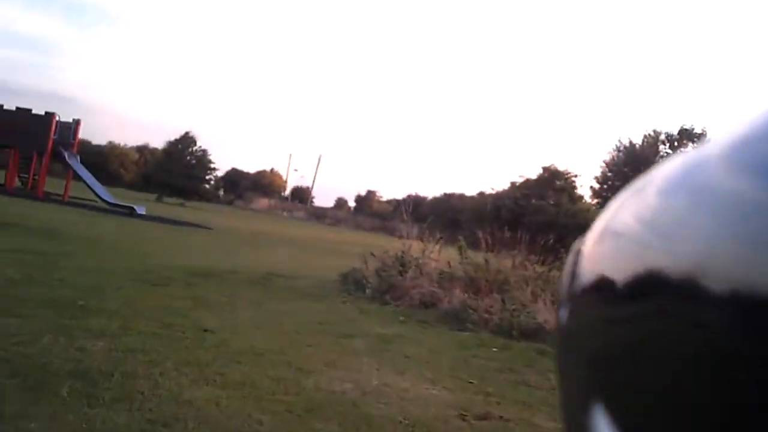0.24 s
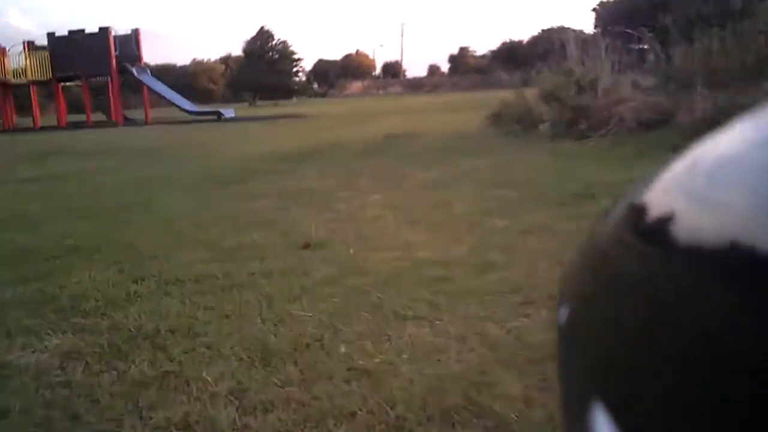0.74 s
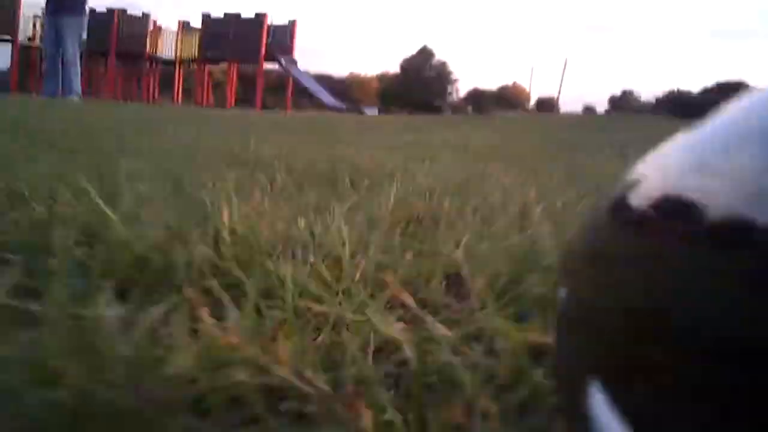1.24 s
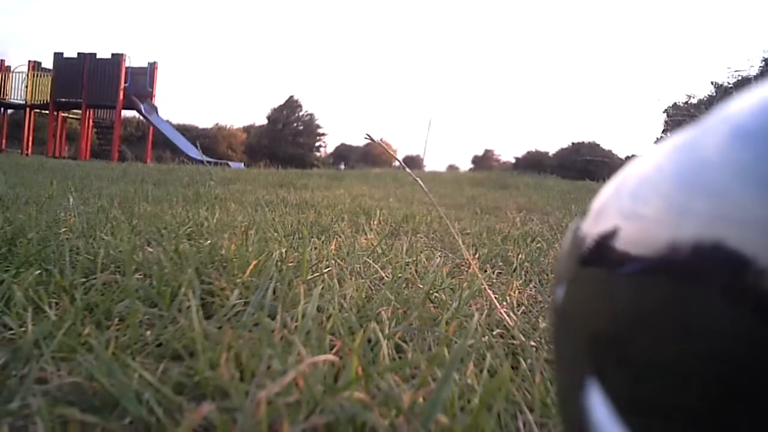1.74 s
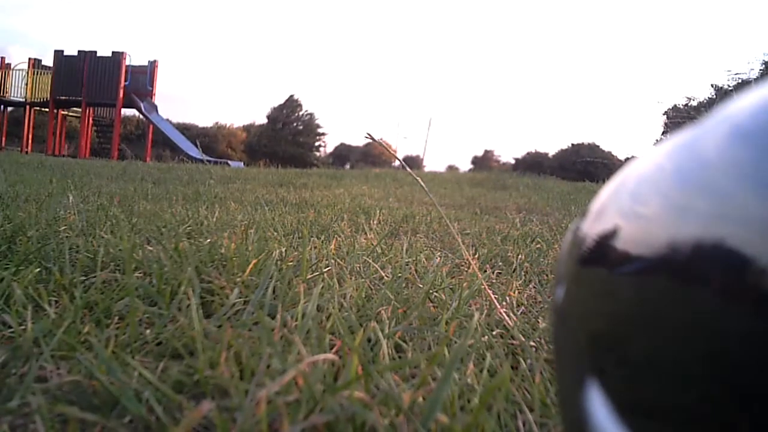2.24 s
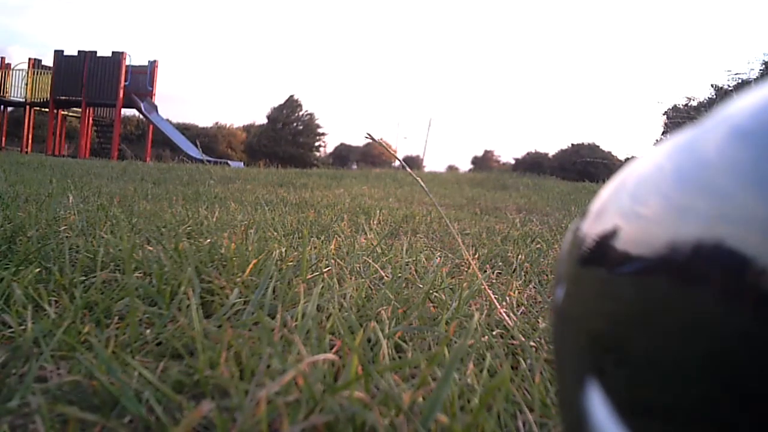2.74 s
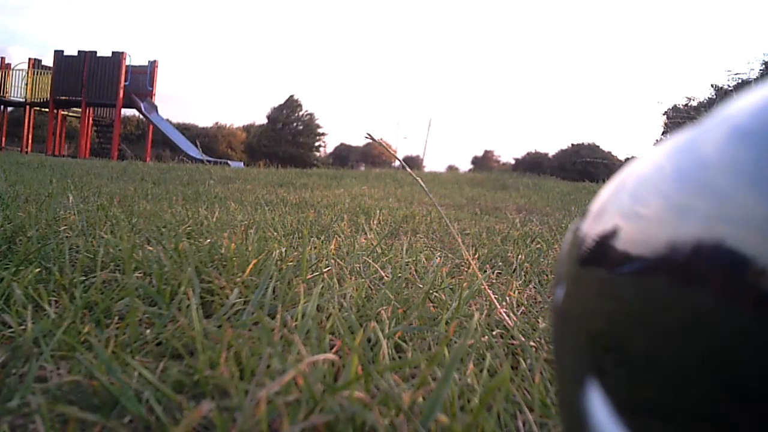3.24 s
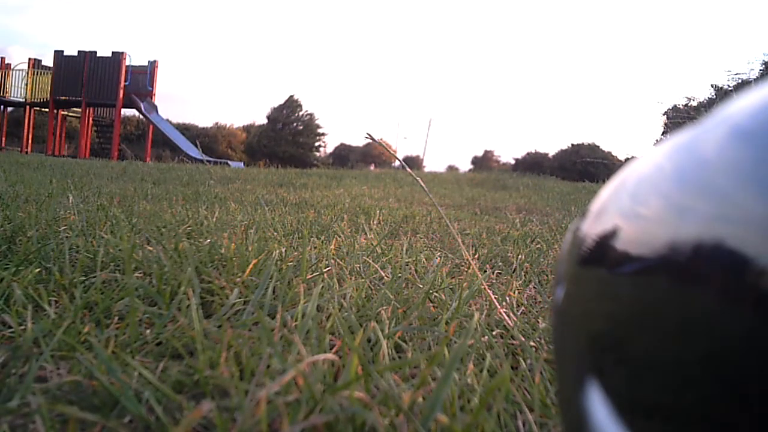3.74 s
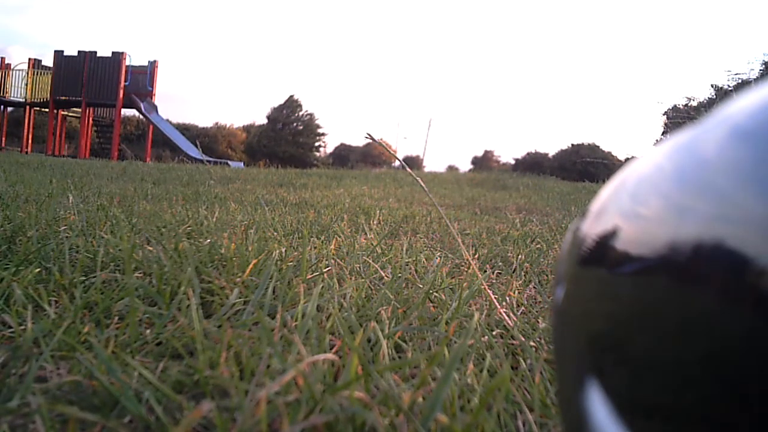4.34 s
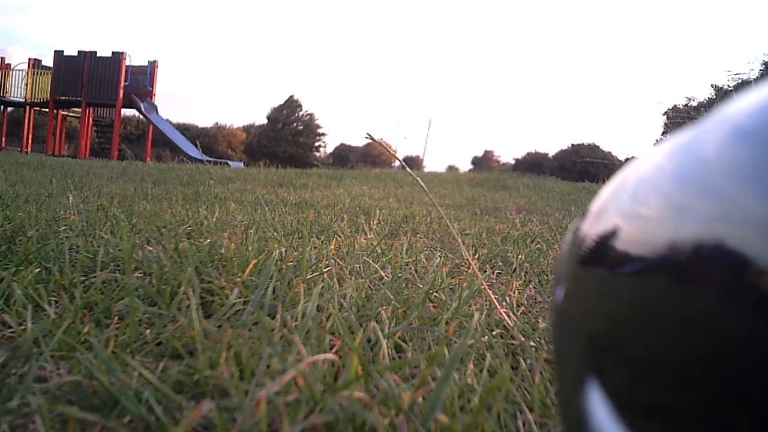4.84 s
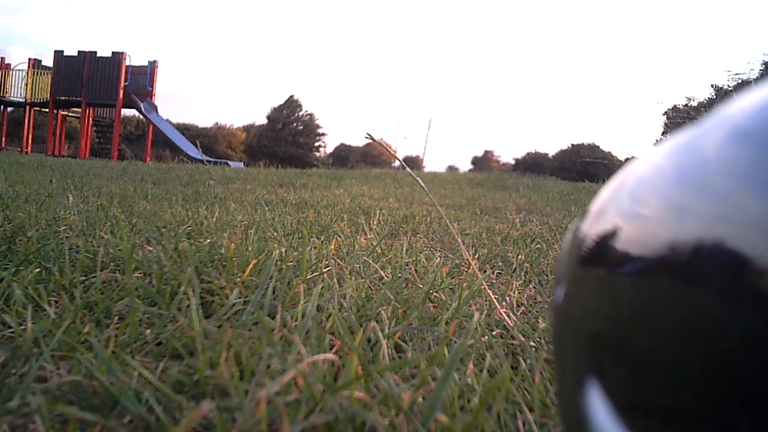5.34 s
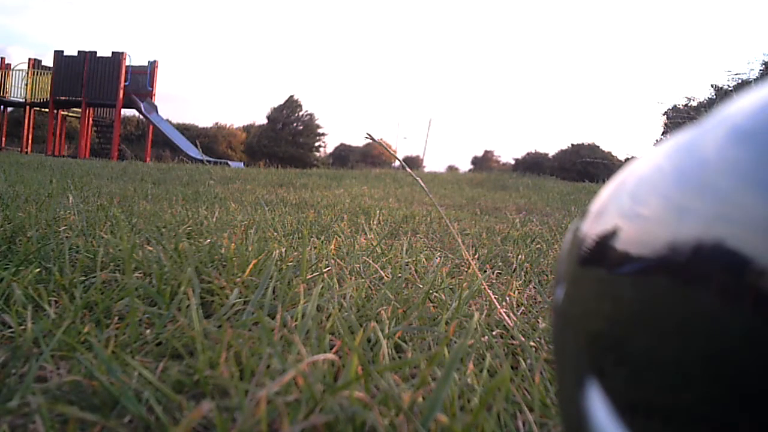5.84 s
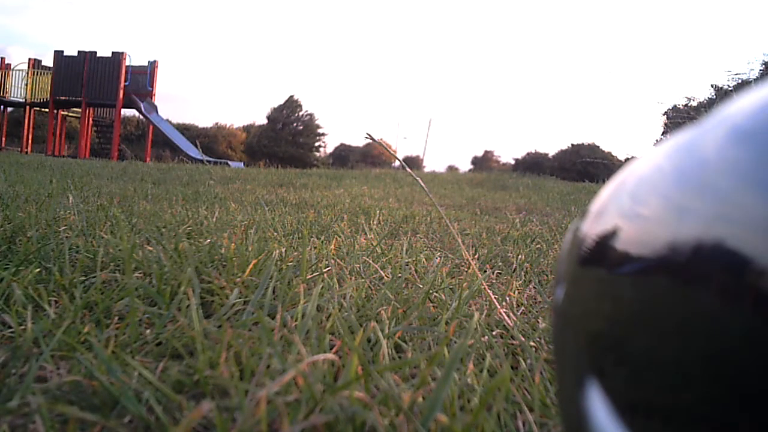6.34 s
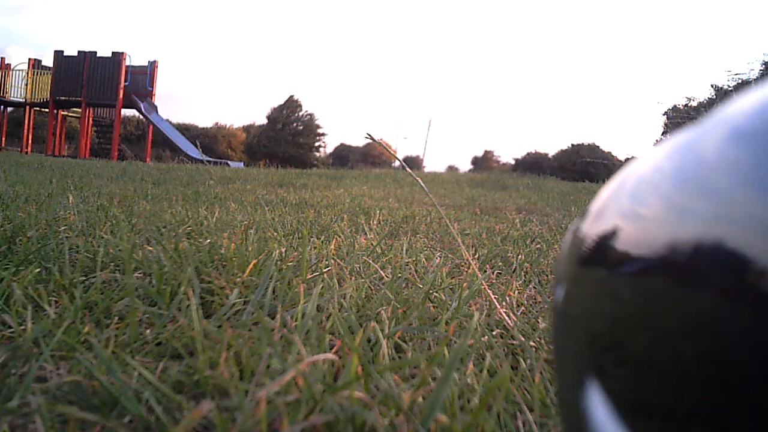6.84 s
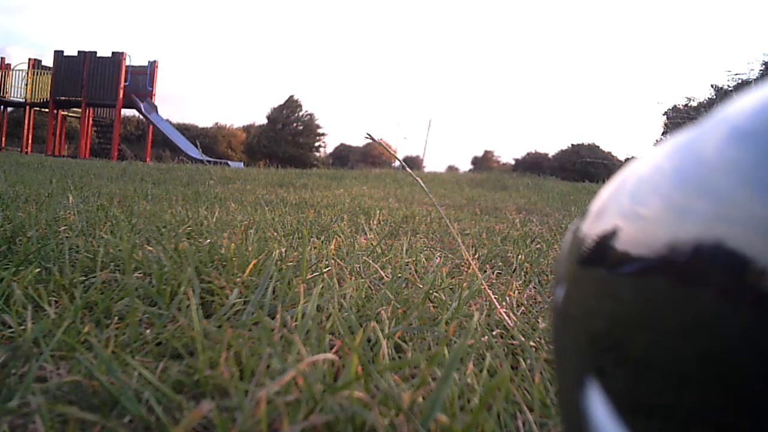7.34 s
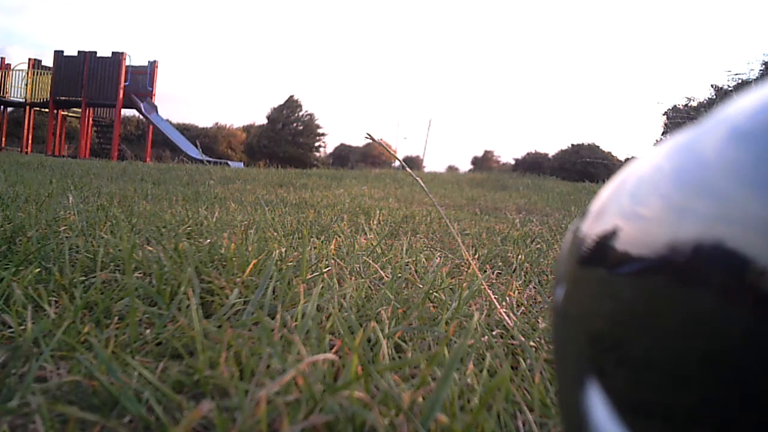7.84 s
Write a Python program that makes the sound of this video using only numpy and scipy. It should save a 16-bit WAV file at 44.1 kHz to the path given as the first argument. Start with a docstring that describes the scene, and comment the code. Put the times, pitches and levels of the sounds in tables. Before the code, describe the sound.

A small electric model plane whines down, knocks onto grass and slides to rest, leaving faint ticks and servo twitches.

```python
"""A small electric model plane glides in, heard from its own body. Magnetic cogging makes the motor
whine; it is throttled back, and its loose shaft rattles once a turn as it runs down. At 1 s the belly
knocks onto grass, bounces and slides to rest, while the rotor chatters to a stop by 2.5 s. Small ticks
ring the airframe ever more rarely, and servo gears twitch now and then over the drone of a far engine."""
import sys
import numpy as np
from scipy import signal
from scipy.fft import rfft, irfft, next_fast_len
from scipy.io import wavfile
from scipy.ndimage import uniform_filter1d

SR = 44100
rng = np.random.default_rng(int(sys.argv[2]) if len(sys.argv) > 2 else 0)


def output_pcm(signal):
    """Save a mono or channel-first signal as 16-bit PCM at the path in sys.argv[1].

    Samples are clipped to [-1, 1] before scaling.
    """
    pcm = np.clip(np.atleast_2d(signal).T, -1, 1) * 32767
    wavfile.write(sys.argv[1], SR, np.round(pcm).astype(np.int16))


N = 357651
TIME = np.arange(N) / SR
HZ = np.fft.rfftfreq(8192, 1 / SR)  # frequency grid of the filter gains


def motor():
    """Rotating machinery: one shaft paces tones and noises alike, until it stands still."""
    speed = shaft_speed()
    turns = np.cumsum(speed) / SR
    tones = propeller(turns, speed) + whine(turns, speed) + controller(turns)
    noises = churn(turns, speed) + rattle_brightness(rattle(turns, speed)) + chatter(turns, speed)
    return (tones + noises) * fading(2.4, db_per_s=300)


# rotation rate as the motor is throttled back: t/s, f/Hz
SHAFT_RATE = [(0, 209.7), (.2, 202.9), (.45, 190), (.6, 168.5), (.7, 153.5), (.8, 135.3), (.9, 119.7),
              (1, 107.2), (1.1, 92)]
def shaft_speed(stop_s=2.477, friction_hz_per_s=36.17, drag=15.6, drag_power=3.12):
    """Run-down: the shaft slows, then coasts, braked by friction and, while fast, by air drag."""
    time_left = np.maximum(stop_s - TIME, 0)
    coasting = friction_hz_per_s * time_left + drag * time_left ** drag_power
    speed = np.where(TIME < SHAFT_RATE[-1][0], curve(SHAFT_RATE), coasting)
    return np.maximum(uniform_filter1d(speed, size=1500), .5)


# harmonics of the propeller: multiple of the shaft rate, relative level/dB
PROPELLER_HARMONICS = [(1, -1), (2, -9.5), (3, -7.5), (4, -15.5), (5, -12.5), (6, -12), (7, -13.5),
                       (8, -8.5), (9, -13.5), (10, -12.5), (12, -15)]
def propeller(turns, speed, shake_db=-24, knee_hz=58, flutter=0.083, mellow_db=8):
    """Rotating unbalance shakes the frame; the upper harmonics flutter more and fade first."""
    share = speed / speed[0]
    sway = .005 * wander(25)
    tones = np.zeros(N)
    for order, db in PROPELLER_HARMONICS:
        phase = 2 * np.pi * (order * (turns + sway) + rng.random())
        level = gain_of(db - mellow_db * (1 - share) * np.log(order))
        tones += level * np.cos(phase) * (1 + flutter * order ** 0.87 * wander(35))
    shake = gain_of(shake_db) * share ** 0.83 / np.hypot(1, (knee_hz / speed) ** 2)
    return np.sqrt(2) * shake * tones


# magnets passing the stator teeth: multiple of the shaft rate, relative level/dB
COGGING_HARMONICS = [(12, -16), (18, -17), (24, -18.5), (26, -28), (28, -20.5), (36, 3), (38, -13),
                     (44, -26)]
# fuselage resonances: f/Hz, width/Hz, gain/dB
FUSELAGE_MODES = [(153, 13.6, -33.5), (267, 14, -38.5), (514, 55.4, -28.5), (765, 94, -25), (936, 24, -26),
                  (1085, 23, -20), (1280, 110, -21), (1503, 189, -27), (2024, 122, -20), (4020, 540, -31),
                  (5230, 940, -37), (6790, 380, -35)]
def whine(turns, speed, flutter=0.044, judder=0.22, rasp=0.17):
    """Forced vibration: cogging tones swell at each resonance and judder as the rotor loses momentum."""
    response = resonant(FUSELAGE_MODES, order=2)
    tones = np.zeros(N)
    for order, db in COGGING_HARMONICS:
        level = gain_of(db) * np.interp(order * speed, HZ, response)
        tones += level * np.cos(2 * np.pi * (order * turns + rng.random()))
    slowness = np.exp(-(speed / 36) ** 4)
    wobble = flutter * (1 + speed / 60) * wander(50)
    stumble = judder * (np.cos(2 * np.pi * turns) + 0.88 * wander(100)) + rasp * wander(354)
    return np.sqrt(2) * tones * (1 + wobble + slowness * stumble)


def controller(turns, switching_hz=8016, level_db=-33.5, throttle_off_s=0.52):
    """Amplitude modulation: the switching tone pulses with each turn until the throttle closes."""
    pulsing = 1 + 0.18 * np.cos(2 * np.pi * turns) + 0.17 * wander(250)
    tone = np.cos(2 * np.pi * switching_hz * TIME) * pulsing
    return gain_of(level_db) * fading(throttle_off_s, db_per_s=1000) * tone


# air and bearing noise, envelope: t/s, level/dB
CHURN_ENVELOPE = [(0, -26), (.35, -27.5), (.78, -30.5), (1, -25.5), (1.08, -34), (1.25, -28), (1.8, -30),
                  (2.08, -40.5), (2.25, -58)]
# its spectrum: f/Hz, relative level/dB
CHURN_SPECTRUM = [(150, -49), (250, -11), (364, -18.5), (404, -10), (513, -11.5), (609, -11), (699, -15),
                  (829, -13.5), (1650, -7.5), (2700, -15), (3620, -9), (5370, -19), (8100, -18),
                  (8820, -26), (15000, -43.5)]
def churn(turns, speed, throb=0.31, dull_hz=2400):
    """Broadband noise of air and bearings, modulated by the shaft and duller at low speed."""
    roughness = grit(9000, spread_db=0.99) * (1 + throb * np.cos(2 * np.pi * turns))
    bright = colour(roughness, smooth(CHURN_SPECTRUM))
    dull = signal.sosfilt(signal.butter(4, dull_hz, fs=SR, output="sos"), bright)
    share = (speed / speed.max()) ** 1.76
    return gain_of(curve(CHURN_ENVELOPE)) * (share * bright + (1 - share) * dull)


# bouts of rattling: t/s, duration/s, relative level/dB
RATTLE_BOUTS = [(.335, 0.69, -27.5), (1.062, 0.017, -30.5), (1.112, 0.028, -30.5), (1.153, .028, -35.5)]
# motor mount resonances: f/Hz, width/Hz, relative gain/dB
MOUNT_MODES = [(926, 1200, -13.5), (2010, 870, -0.5), (3010, 250, 1.5), (3550, 178, 4), (4000, 200, -4),
               (4240, 510, -4), (4800, 280, -7), (5420, 320, -3), (6240, 420, -6.5), (7350, 570, -3),
               (8220, 380, -0.5), (9570, 710, -12), (10800, 1100, -23), (11200, 1400, -26.5),
               (11800, 930, -17.5), (13550, 900, -13.5), (14800, 700, -18)]
def rattle(turns, speed, bounce_s=0.000702, bounce=0.31, scrape_s=0.00089, shiver_s=0.0031):
    """Periodic impact: once a turn the loose shaft strikes its mount, bounces and scrapes."""
    hit_samples = np.interp(np.arange(1, turns[-1]), turns, np.arange(N))
    sizes = 1 + 0.1 * rng.standard_normal(len(hit_samples))
    places = np.r_[hit_samples, hit_samples + bounce_s * SR]
    blows, taps = np.zeros(N), np.arange(-8, 9)
    for place, size in zip(places, np.r_[sizes, -bounce * sizes]):
        impulse = np.sinc(taps - place % 1) * np.hanning(len(taps))  # falls between samples
        add(blows, (int(place) + taps[0]) / SR, size * impulse)
    since_hit = turns % 1 / speed
    scrape = np.exp(-since_hit / scrape_s) * rng.standard_normal(N) / np.sqrt(scrape_s * SR / 2)
    # the foam body shivers after each blow, differently every time
    shiver = np.exp(-since_hit / shiver_s) * rng.standard_normal(N) / np.sqrt(shiver_s * SR / 2)
    blows += 0.089 * scrape + 0.39 * colour(shiver, 1 / (1 + (HZ / 3000) ** 4))
    # dispersion of bending waves: all-pass stages spread each blow in time
    for pole in [.6, -.6] * 4:
        blows = signal.lfilter([pole, 0, 1], [1, 0, pole], blows)
    ringing = colour(blows * np.sqrt(SR / speed), resonant(MOUNT_MODES))
    return bouts(RATTLE_BOUTS, attack_s=0.0042, release_s=.004) * ringing


# treble of the rattle: t/s, gain/dB
TREBLE_GAIN = [(.36, -8), (.42, -1), (.48, -1), (.53, 8), (.62, 2), (.76, -19), (.83, 4), (1, -3),
               (1.1, -15)]
def rattle_brightness(sound, edge_hz=12700):
    """A time-varying shelf filter lifts or dulls the rattle's topmost ring."""
    hz = np.fft.rfftfreq(N, 1 / SR)
    treble = irfft(rfft(sound) / (1 + (edge_hz / (hz + 1)) ** 20), N)
    return sound + (gain_of(curve(TREBLE_GAIN)) - 1) * treble


# the chatter flares into squeals: t/s, duration/s, relative level/dB
SQUEAL_BOUTS = [(1.737, 0.043, -33), (1.84, .025, -33), (1.905, 0.014, -26)]
# nose resonances: f/Hz, width/Hz, relative gain/dB
NOSE_MODES = [(854, 70, 7), (1190, 120, 10), (1772, 160, 6), (2033, 210, -0.5), (2330, 72, -9),
              (3490, 220, -10)]
def chatter(turns, speed, cogs=36, strongest_at_hz=21, width_octaves=0.79):
    """Impulse-train excitation: at low speed each magnet snaps past its tooth and rings the nose."""
    snaps = np.diff(np.floor(cogs * turns), prepend=0) * (1 + 0.47 * rng.standard_normal(N))
    snaps *= 1 + 0.91 * np.cos(4 * np.pi * turns)  # the two blades load the shaft in turn
    force = gain_of(-39) * np.exp(-(np.log2(speed / strongest_at_hz) / width_octaves) ** 2)
    force += bouts(SQUEAL_BOUTS, attack_s=0.0058, release_s=0.013)
    return force * colour(snaps * np.sqrt(SR / (cogs * speed)), resonant(NOSE_MODES))


# the belly meets the ground: t/s, relative level/dB, half period/s
BELLY_BUMPS = [(1.005, -2, 0.015), (1.232, -8, 0.0258)]
# knocks of the frame: t/s, relative level/dB, decay time/s
FRAME_KNOCKS = [(1.0112, 2, 0.0015), (1.0135, 2.5, 0.00074), (1.024, -12, .002), (1.028, -1.5, 0.0008),
                (1.063, -11.5, 0.002), (1.258, -21, 0.0025), (1.2945, -9, .0018), (1.297, -10.5, 0.00098)]
# airframe resonances: f/Hz, width/Hz, relative gain/dB
AIRFRAME_MODES = [(176, 73, -1.5), (783, 360, -7.5), (1240, 99, 1), (1510, 260, -6), (2006, 260, 0),
                  (2330, 140, 1.5), (2990, 270, -8.5), (3450, 190, -4), (4040, 360, -5.5),
                  (4650, 440, -13.5), (5440, 280, -13.5), (5910, 220, -10), (7070, 870, -16),
                  (7840, 380, -9), (8760, 690, -15), (10560, 1600, -19.5), (12170, 990, -26),
                  (14760, 1200, -31)]
def landing(wing_hz=103, wing_decay_s=0.03):
    """Impact: slow pushes set the wing in damped vibration, and short knocks ring frame and mount."""
    bumps, t = np.zeros(N), TIME[:SR // 4]
    wing = gain_of(-13) * np.sin(2 * np.pi * wing_hz * t) * np.exp(-t / wing_decay_s)
    for s, db, half_period in BELLY_BUMPS:
        push = np.sin(np.pi * t / half_period) * np.exp(-(t / (1.94 * half_period)) ** 2)
        add(bumps, s, gain_of(db) * (push + wing))
    response = resonant(AIRFRAME_MODES) + 0.7 * resonant(MOUNT_MODES)
    return bumps + gain_of(-5) * colour(strikes(FRAME_KNOCKS), response)


# thicker tufts brush past: t/s, duration/s, level/dB
GRASS_TUFTS = [(1.02, 0.018, -36), (1.235, 0.051, -44), (1.42, 0.026, -45), (1.555, 0.032, -41.5),
               (1.652, 0.0051, -46)]
# rubbed grass: f/Hz, relative level/dB
GRASS_SPECTRUM = [(1530, -28), (2600, -10.5), (4190, -6.5), (5250, -13), (5960, -13), (7800, -14),
                  (9680, -21), (15500, -31.5)]
def slide(start_s=1.2, rest_s=2.05, rub_db=-43.5, patchy_db=4.5):
    """Sliding friction: grass brushes the belly unevenly, louder in tufts, until the plane rests."""
    rub = gain_of(rub_db) * (TIME > start_s) * fading(start_s, db_per_s=15)
    rub *= fading(rest_s, db_per_s=100)
    tufts = bouts(GRASS_TUFTS, attack_s=0.0037, release_s=0.0054)
    force = (rub + tufts) * gain_of(patchy_db * wander(59.7))
    return force * colour(grit(1300, spread_db=1.7), smooth(GRASS_SPECTRUM))


# knocks and small ticks as plane and rotor come to rest: t/s, relative level/dB
AIRFRAME_TICKS = [(1.241, -14.5), (1.906, -22), (2.091, -33), (2.148, -30.5), (2.237, -34), (2.295, -29),
                  (2.315, -35), (2.337, -36), (2.374, -39), (2.435, -39), (2.757, -35), (2.935, -40),
                  (3.14, -37), (3.354, -41), (3.51, -40.5), (3.677, -38), (3.861, -42.5)]
# belly and wing resonances: f/Hz, width/Hz, relative gain/dB
BELLY_MODES = [(803, 143, 10), (1260, 110, -19), (1800, 290, -4), (2370, 300, -9.5), (3240, 310, -12)]
WING_MODES = [(1195, 390, 6), (2100, 620, 3), (2950, 290, -0.5), (3560, 270, 2), (4070, 280, -5),
              (7700, 7500, -15.5)]
def ticks(start_s=2.1, end_s=3.6, count=14, decay_s=.0055):
    """Impulse response: knocks and small ticks ring now the belly, now a wing, ever more rarely."""
    time_chance, level_chance = rng.random((count, 2)).T
    delay = (end_s - start_s) * ((np.arange(count) + time_chance) / count) ** 2
    random_ticks = zip(start_s + delay, -38 - 0.5 * delay + 2 * (2 * level_chance - 1))
    hits = [(s, db, decay_s) for s, db in [*AIRFRAME_TICKS, *random_ticks]]
    toward_belly = gain_of(4.5 * wander(3.1))
    belly = colour(strikes(hits) * toward_belly, resonant(BELLY_MODES))
    wing = colour(strikes(hits) / toward_belly, resonant(WING_MODES))
    return gain_of(-11) * (belly + wing)


# servo movements: t/s, run time/s, level at full speed/dB
SERVO_TWITCHES = [(1.991, 0.027, -29.5), (2.028, 0.03, -28.5), (2.653, 0.0014, -38.5), (4.811, 0.012, -34),
                  (4.829, 0.019, -21.5), (4.857, 0.0037, -37), (5.664, 0.018, -28), (5.695, .009, -33),
                  (7.176, 0.027, -27), (7.207, 0.021, -24.5), (7.4495, 0.0048, -31), (7.461, 0.007, -27.5),
                  (7.573, 0.0056, -33.5), (7.744, 0.0031, -35.5)]
# bands in which the gears sing: f/Hz, width/Hz, relative gain/dB
GEAR_BANDS = [(2030, 300, -4), (2390, 300, -5.5), (4190, 90, -4)]
def servos(climb_db_per_s=378, coast_s=0.0038):
    """Gear noise: a servo speeds up and coasts; tooth impacts ring the frame, and fast gears sing."""
    force, t = np.zeros(N), TIME[:SR // 10]
    for s, run_s, db in SERVO_TWITCHES:
        climb = gain_of(db - climb_db_per_s * np.maximum(run_s - t, 0))
        coast = np.exp(-np.maximum(t - run_s, 0) / coast_s)
        add(force, s, climb * coast)
    teeth = colour(force * grit(7000, spread_db=2.8), resonant(AIRFRAME_MODES))
    song_level = force * np.sqrt(force / force.max())
    song = colour(song_level * rng.standard_normal(N), resonant(GEAR_BANDS))
    return teeth + gain_of(-3) * song


# far engine, envelope: t/s, relative level/dB
ENGINE_ENVELOPE = [(1.2, -48), (2.2, -42), (3.5, -41.5), (5.2, -43.5), (5.8, -41), (6.9, -39), (7.5, -41.5),
                   (8.1, -41)]
# its harmonics: multiple of the fundamental, relative level/dB
ENGINE_HARMONICS = [(1, -3.5), (2, -18), (3, -28)]
def far_engine(start_hz=144.4, sag_hz_per_s=1.29, waver=0.16):
    """A harmonic series sinks slowly in pitch; its path through the air varies phase and amplitude."""
    turns = np.cumsum(start_hz - sag_hz_per_s * TIME) / SR
    tones = np.zeros(N)
    for order, db in ENGINE_HARMONICS:
        phase = 2 * np.pi * order * turns + .2 * wander(5)
        tones += gain_of(db) * np.cos(phase) * (1 + waver * wander(4.6))
    return np.sqrt(2) * gain_of(curve(ENGINE_ENVELOPE)) * tones


# wind on the microphone, and the open field: f/Hz, relative level/dB
WIND_SPECTRUM = [(7.1, -33), (12, 9), (30, -2.5), (45, -7.5), (70, -18.5), (130, -20), (170, -43.5),
                 (290, -120)]
FIELD_SPECTRUM = [(8.8, -36.5), (15, -6.5), (106, -11), (122, -12), (141, -13), (163, -10), (239, -17),
                  (276, -13.5), (301, -19.5), (359, -13.5), (391, -21), (524, -22.5), (765, -34),
                  (14100, -44.5), (15800, -45)]
def air(wind_db=-26, gusty_db=2.5, slowing_s=1.37, field_db=-46.5):
    """Flow noise: gusts on the microphone die as the plane slows, leaving the hush of the field."""
    wind = gain_of(wind_db + gusty_db * wander(6)) * fading(slowing_s, db_per_s=34)
    return wind * hiss(WIND_SPECTRUM) + gain_of(field_db) * hiss(FIELD_SPECTRUM)


def gain_of(db):
    """Decibels to amplitude ratio."""
    return 10 ** (np.asarray(db) / 20)


def unit_rms(x):
    """Normalisation to rms 1."""
    return x / np.sqrt(np.mean(x ** 2) + 1e-20)


def curve(rows):
    """Linear interpolation of (t/s, value) rows at every sample."""
    return np.interp(TIME, *np.transpose(rows))


def fading(s, db_per_s):
    """Gain 1 until time s, then exponential decay."""
    return gain_of(-db_per_s * np.maximum(TIME - s, 0))


def bouts(rows, attack_s, release_s):
    """Exponential rise, hold and decay for each (t/s, duration/s, level/dB) row."""
    envelope = np.zeros(N)
    for s, length, db in rows:
        before, after = np.maximum(s - TIME, 0), np.maximum(TIME - s - length, 0)
        envelope += gain_of(db) * np.exp(-before / attack_s - after / release_s)
    return envelope


def wander(hz):
    """Low-pass Gaussian noise of rms 1, up to about hz."""
    size = next_fast_len(N)
    spectrum = rfft(rng.standard_normal(size))
    low_pass = np.exp(-(np.fft.rfftfreq(size, 1 / SR) / hz) ** 2)
    return unit_rms(irfft(spectrum * low_pass, size)[:N])


def smooth(points):
    """Magnitude response through (f/Hz, level/dB) points, interpolated in log frequency."""
    hz, db = np.transpose(points)
    return gain_of(np.interp(np.log(HZ + 1), np.log(hz + 1), db))


def resonant(modes, order=3):
    """Magnitude response of steep-sided resonances that add in power."""
    powers = (gain_of(2 * db) / (1 + ((HZ - hz) / width) ** 2) ** order for hz, width, db in modes)
    return np.sqrt(sum(powers))


def colour(x, gain):
    """Minimum-phase filter of this magnitude response, scaled to unit energy."""
    log_gain = np.log(np.maximum(np.r_[gain, gain[-2:0:-1]], 1e-5))
    taps = np.fft.ifft(np.exp(signal.hilbert(log_gain).conj())).real[:len(HZ)]
    return signal.oaconvolve(x, taps / np.linalg.norm(taps))[:N]


def hiss(points):
    """Stationary noise of rms 1 with this spectrum."""
    return colour(rng.standard_normal(N), smooth(points))


def grit(per_s, spread_db):
    """Shot noise of rms 1: dense clicks of uneven size."""
    size = gain_of(spread_db * np.minimum(rng.exponential(1, N), 4))
    return unit_rms(size * rng.choice([-1, 1], N) * (rng.random(N) < per_s / SR))


def strikes(rows):
    """Contact noise: a decaying crunch for each (t/s, level/dB, decay time/s) row."""
    force, t = np.zeros(N), TIME[:SR // 20]
    for s, db, decay_s in rows:
        add(force, s, gain_of(db) * np.exp(-t / decay_s))
    return force * grit(14000, spread_db=0.45)


def add(mix, s, sound):
    """Superposes a sound at time s."""
    part = mix[round(s * SR):][:len(sound)]
    part += sound[:len(part)]


def scene():
    """Superposition of the plane, the grass and the field, in one channel."""
    return (motor() + landing() + slide() + ticks() + servos() + far_engine() + air())[None]


def record(dry, ceiling=0.51, edge_hz=15750):
    """Saturation: the small microphone overloads on the hardest knock; a low-pass limits the band."""
    limited = dry / (1 + (dry / ceiling) ** 8) ** (1 / 8)
    low_pass = signal.firwin(511, edge_hz, window=("kaiser", 9), fs=SR)
    return signal.oaconvolve(limited, low_pass[None], "same")


dry = scene()
out = record(dry)
output_pcm(out)
```